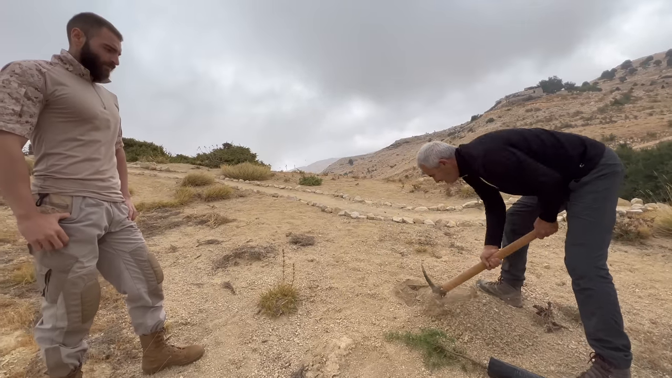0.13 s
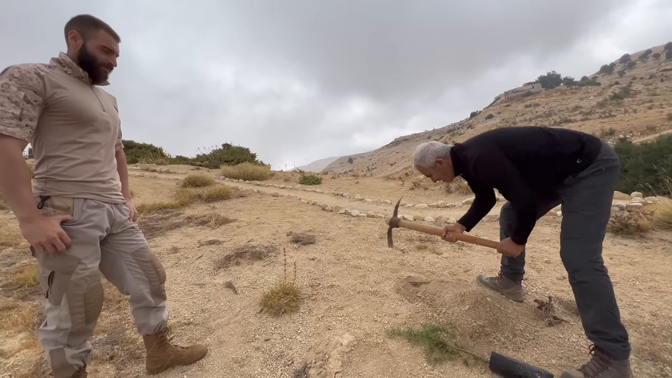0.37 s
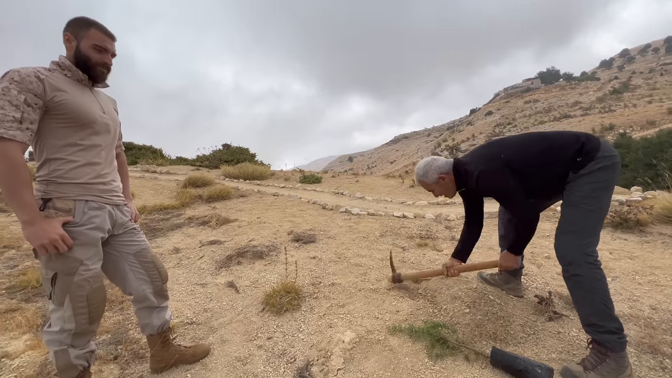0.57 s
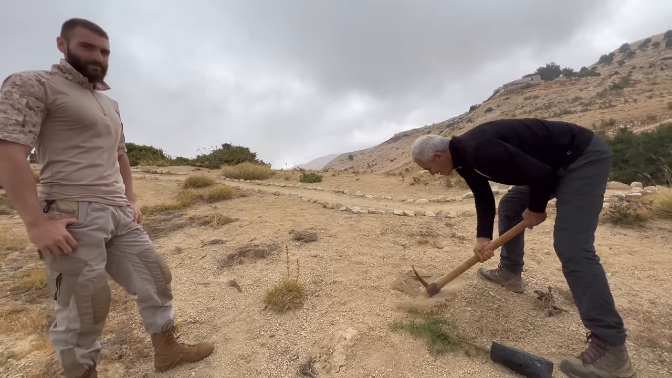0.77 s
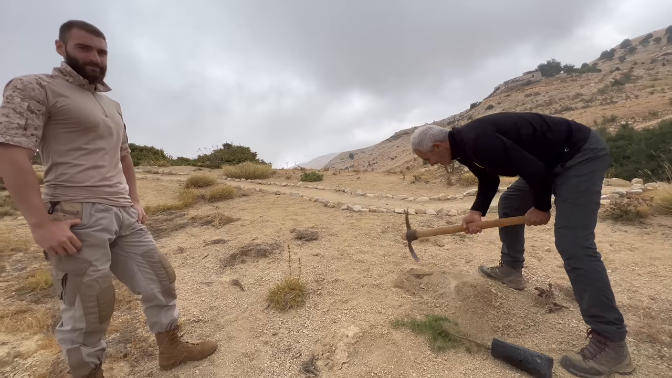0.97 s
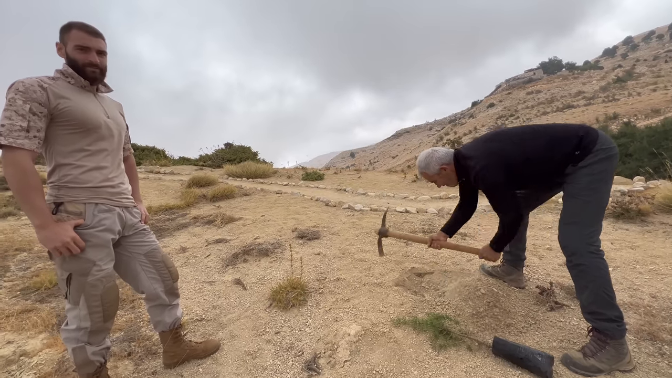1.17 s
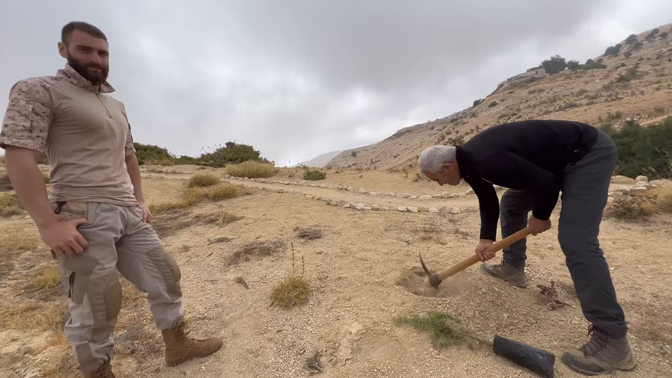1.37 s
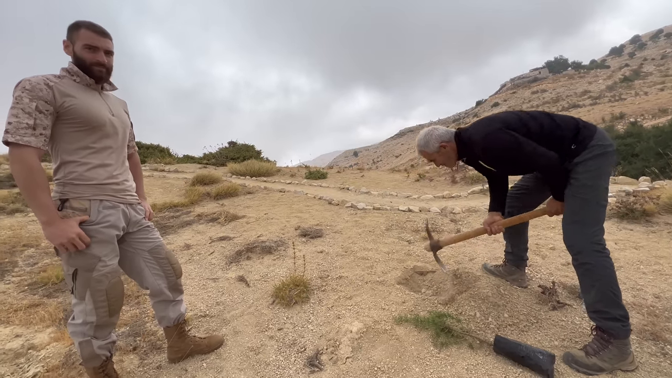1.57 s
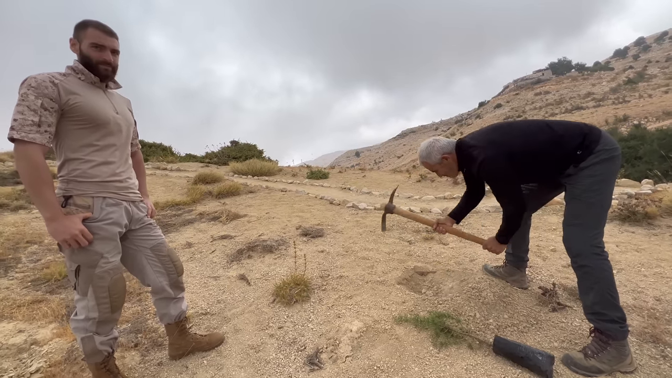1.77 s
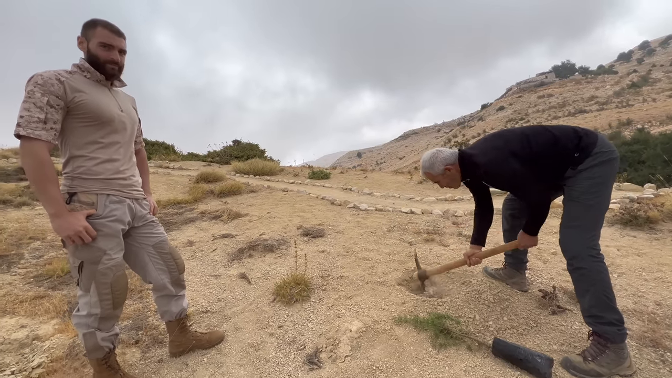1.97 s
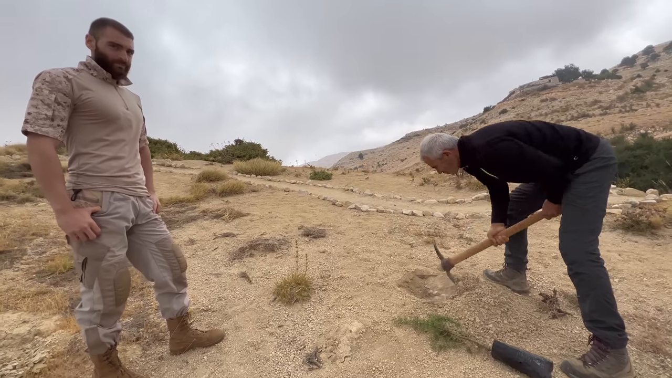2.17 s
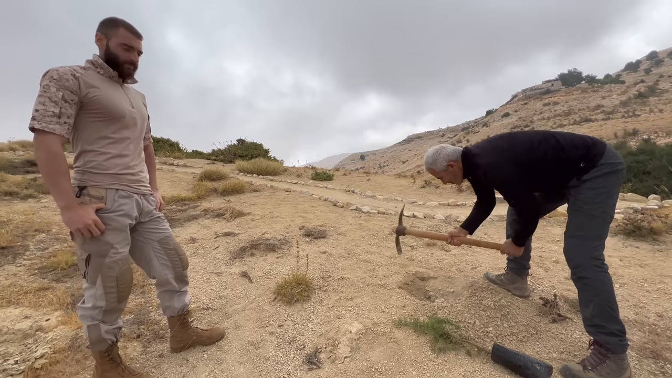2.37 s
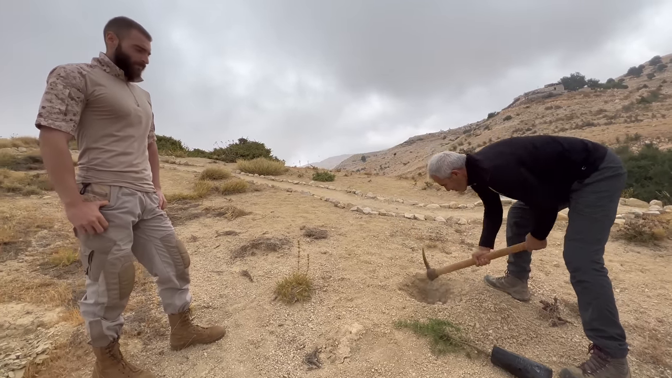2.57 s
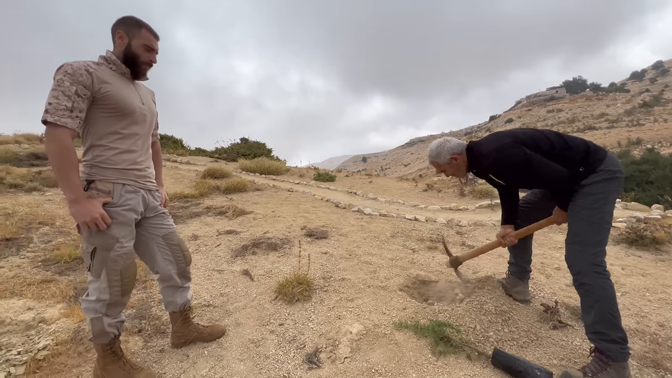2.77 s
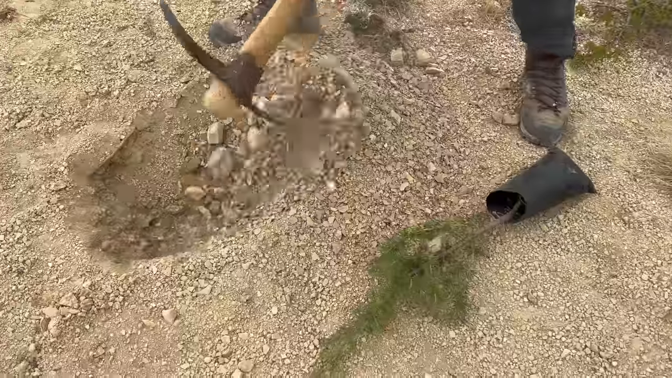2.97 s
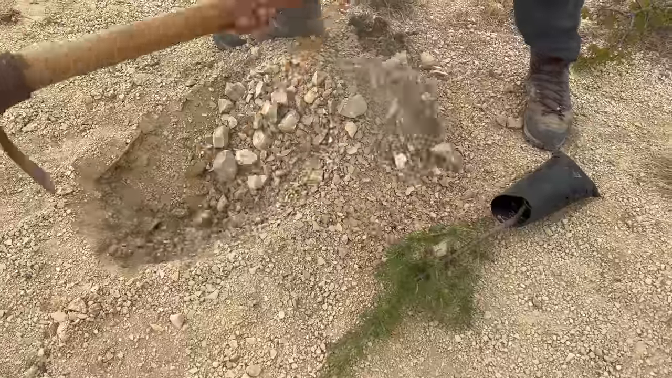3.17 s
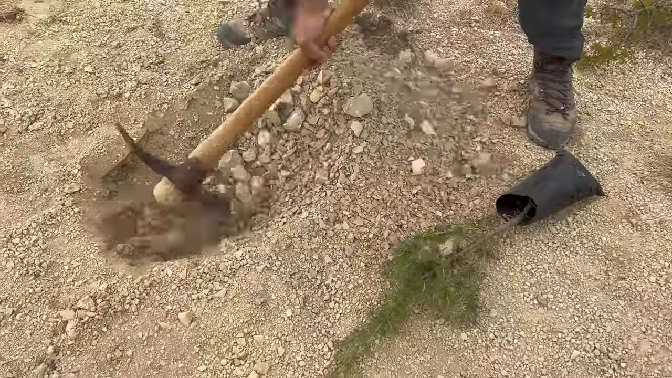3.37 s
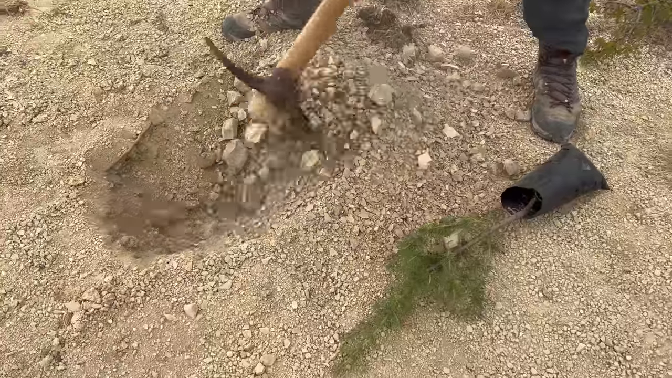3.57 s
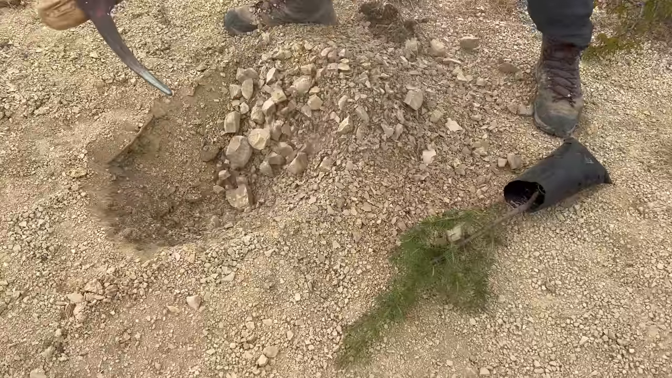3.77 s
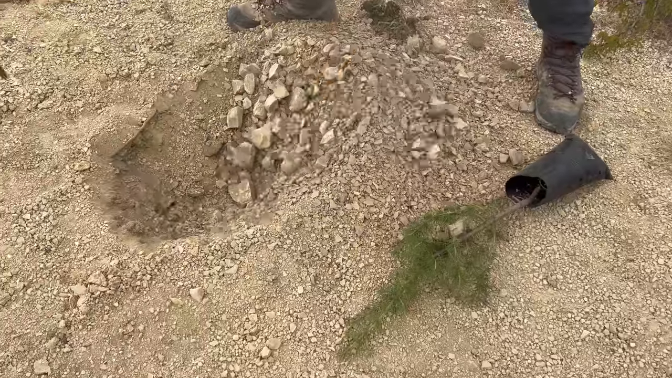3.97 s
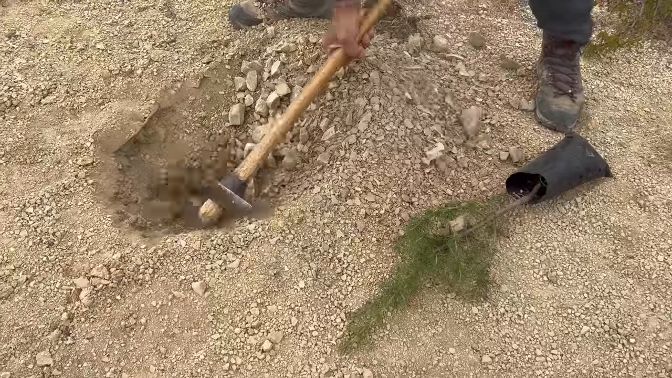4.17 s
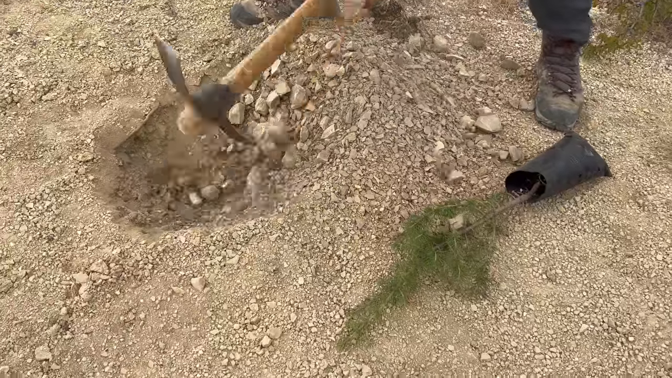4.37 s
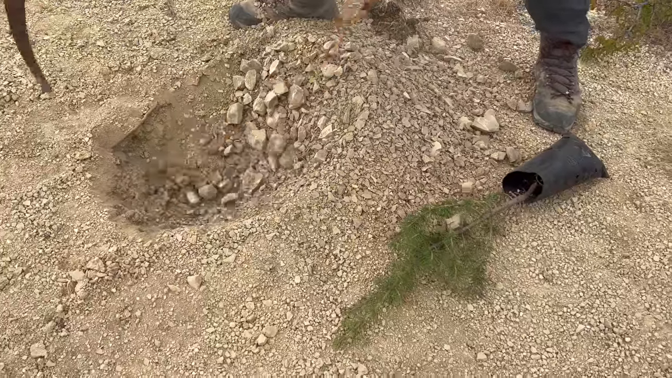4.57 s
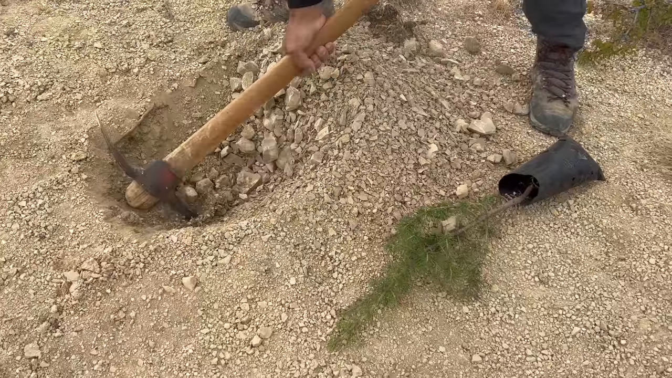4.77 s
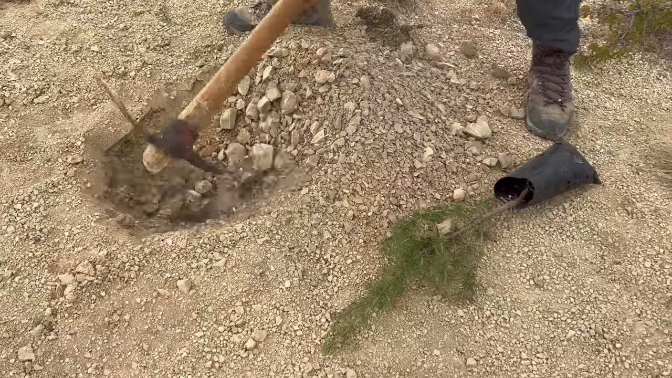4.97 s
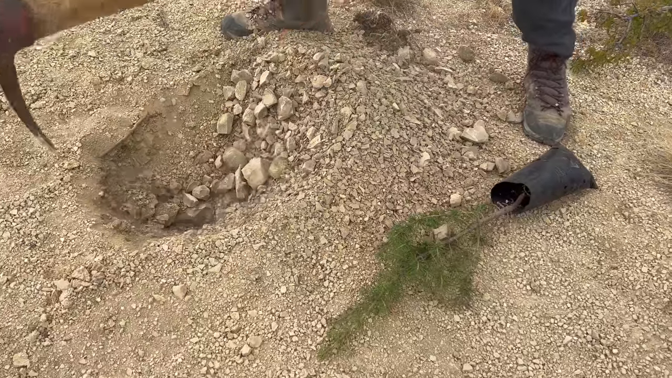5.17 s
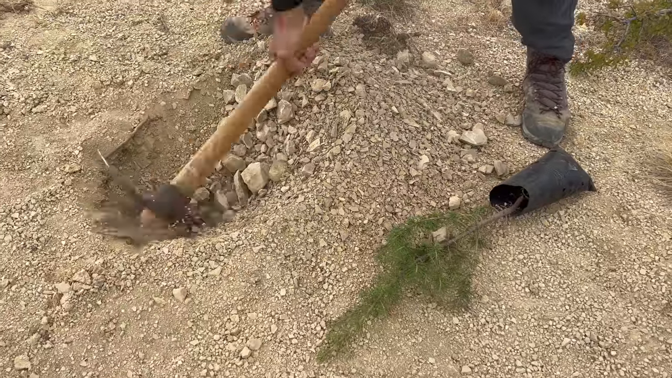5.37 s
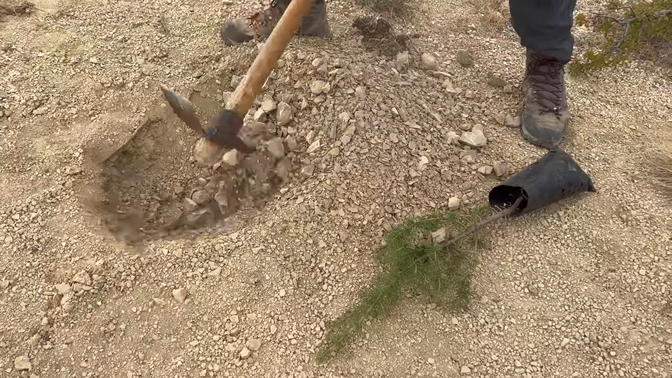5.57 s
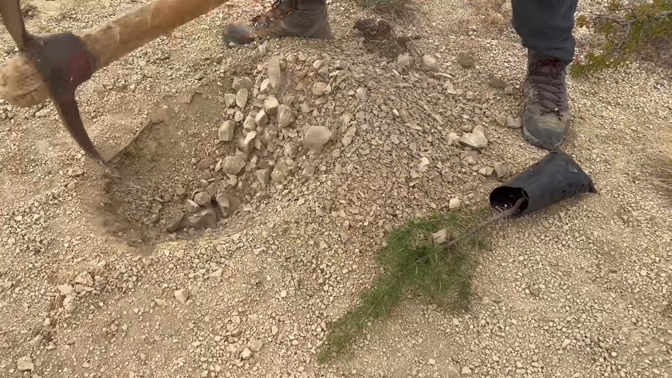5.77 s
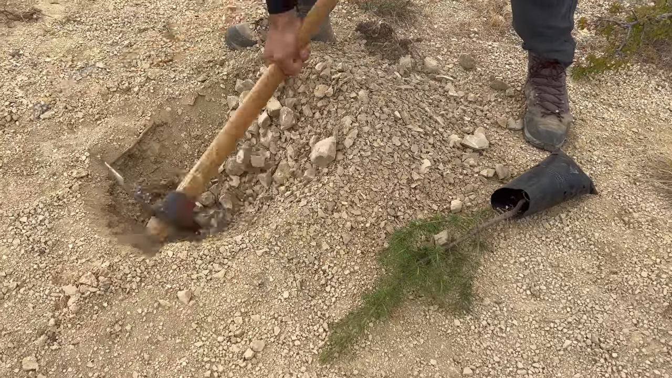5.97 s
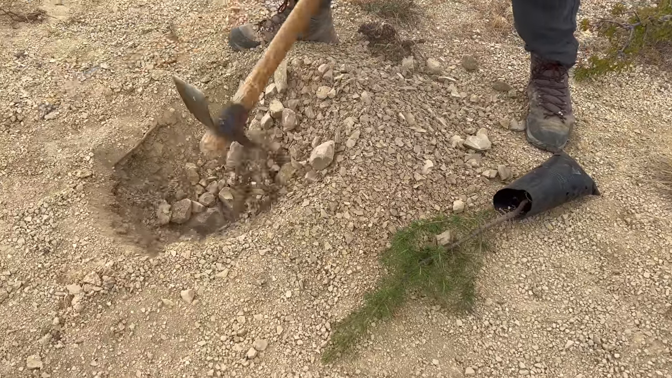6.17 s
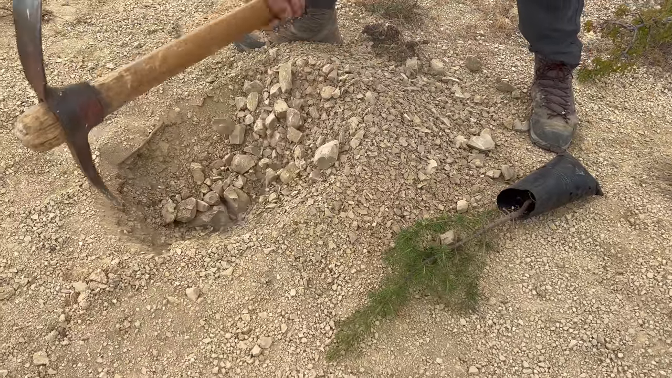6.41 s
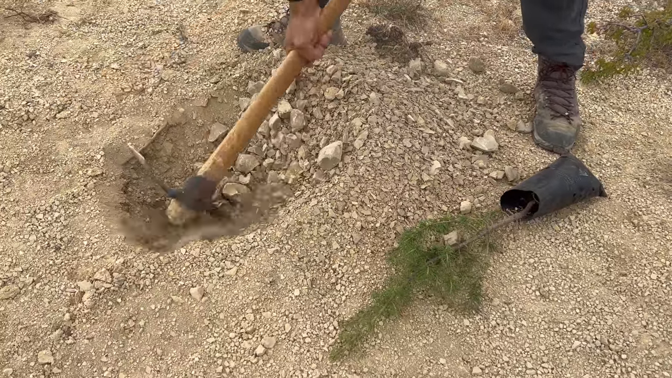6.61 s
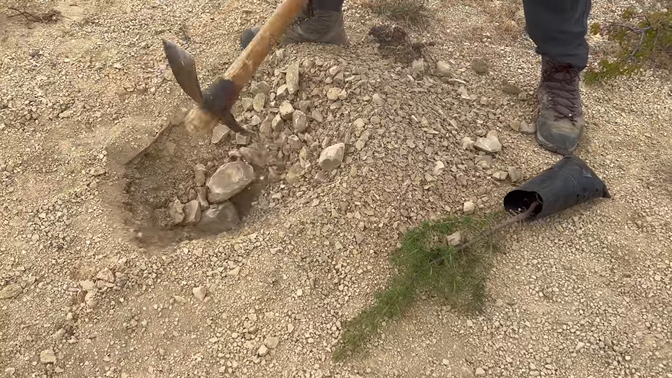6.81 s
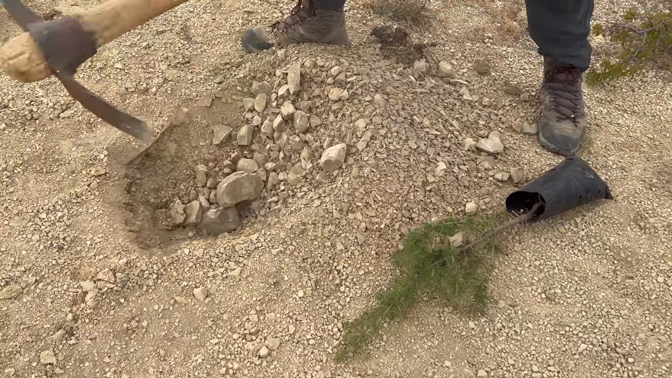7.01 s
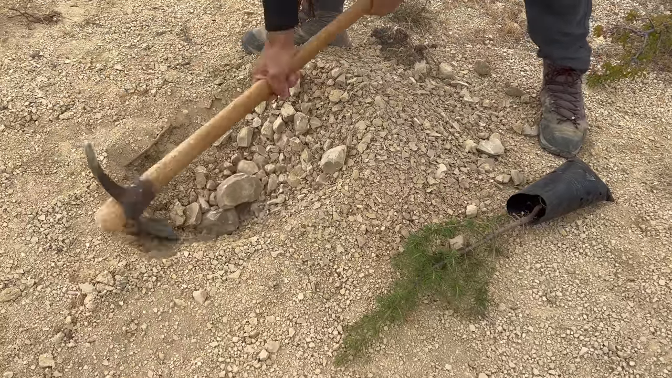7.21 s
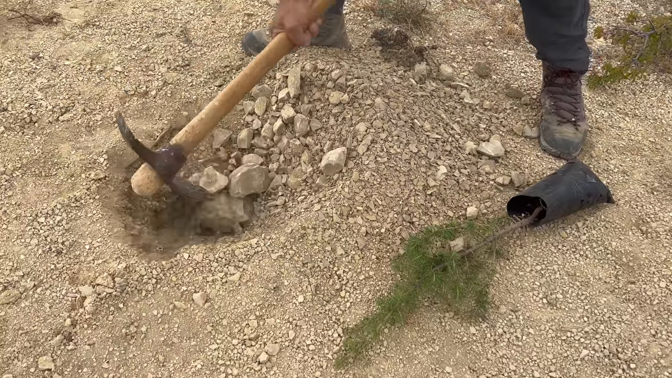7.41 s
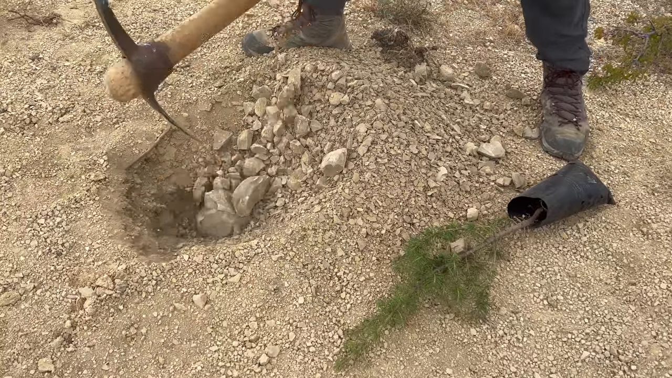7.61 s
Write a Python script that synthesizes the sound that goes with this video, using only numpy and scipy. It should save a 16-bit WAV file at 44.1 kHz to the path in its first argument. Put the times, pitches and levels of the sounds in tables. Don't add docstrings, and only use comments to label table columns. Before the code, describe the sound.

A mattock digs dry, stony soil outdoors. Four blows are heard from a distance, slightly dull, each a crunchy steel-on-stone clump followed by a short gravel drag. After a tiny dropout near 2.9 seconds the microphone is close: eight harder, brighter blows, the loudest overloaded, with sandy scraping, stone clacks, pebbles ticking down and brief rings from the freed steel head. Faint crumbs, dust and low rumble lie underneath, with no room echo.

```python
import sys
import numpy as np
from scipy import signal
from scipy.fft import rfft, irfft, next_fast_len
from scipy.io import wavfile
from scipy.ndimage import uniform_filter1d

SR = 44100
rng = np.random.default_rng(int(sys.argv[2]) if len(sys.argv) > 2 else 0)


def volts_from_db(level):
    exponent = np.asarray(level, float) / 20
    return 10 ** exponent


def wav_out(sig):
    wavfile.write(sys.argv[1], SR, np.round(np.clip(np.atleast_2d(sig).T, -1, 1) * 32767).astype(np.int16))


N = 337365
DROPOUT_START, DROPOUT_END = 2.859, 2.873

# arrival of the edge in seconds, dying time in ms, thud level in dB, grit level in dB.
STROKES = [(0.56, 37, -23, -21.5), (1.25, 31.6, -19, -17), (1.34, 26, -26.5, -40),
           (1.93, 22.3, -22.5, -17.5), (2.5, 47, -24.5, -16), (3.315, 24.6, -17, -13.5),
           (3.362, 12.3, -16.5, -28.5), (4.11, 23.5, -11, -19.5), (4.755, 49, -12, -24),
           (5.335, 24.4, -20.5, -25.5), (5.95, 32, -21, -26.5), (6.53, 39.4, -16.5, -30),
           (7.222, 15, -15.5, -20)]
# pitch in Hz, time to fall 60 dB in seconds, level when rubbed in dB.
STEEL_RINGS = [(964, .22, -2), (1593, .14, -2), (2083, .06, 0), (2902, .055, -6), (4040, .06, -8),
               (5330, .06, -11), (8646, .14, -19), (9200, .08, -19), (11310, .15, -25)]
# frequency in Hz, density in dB per Hz.
GRAVEL_COLOUR = [(200, -25), (500, -10.5), (900, -2.5), (1600, -5), (3000, -8), (5000, -11), (8000, -23.5),
                 (12000, -44.5)]
# frequency in Hz, density in dB per Hz.
CLOD_COLOUR = [(20, -26.5), (60, -3.5), (120, -1.5), (300, -4), (500, -7.5), (900, -46)]


def evened(x):
    return x / np.sqrt(np.mean(x ** 2) + 1e-20)


def peaked(x):
    return x / (abs(x).max() + 1e-20)


def add(mix, s, sound):
    part = mix[round(s * SR):][:len(sound)]
    part += sound[:len(part)]


def ringing(x, modes):
    size = next_fast_len(len(x))
    f = np.fft.rfftfreq(size, 1 / SR)
    gain = 0
    for k, (hz, width, db) in enumerate(modes):
        loss = 1j * f * abs(width)
        gain = gain + (-1) ** k * volts_from_db(db) * loss / (hz ** 2 - f ** 2 + loss + 1e-9)
    return irfft(rfft(x, size) * gain, size)[:len(x)]


def coloured(x, points):
    hz, db = np.transpose(points)
    size = next_fast_len(len(x))
    f = np.fft.rfftfreq(size, 1 / SR)
    gain = volts_from_db(np.interp(np.log(f + 1), np.log(hz), db))
    return evened(irfft(rfft(x, size) * gain, size)[:len(x)])


def wander(size, span):
    smooth = uniform_filter1d(rng.standard_normal(size), span)
    return evened(uniform_filter1d(smooth, span))


def grains(size, per_s, spread_db):
    hit, sign, big = rng.random((size, 3)).T
    strength = volts_from_db(spread_db * np.minimum(-np.log(1 - big), 5))
    return (hit < per_s / SR) * np.sign(sign - .5) * strength


def crumbs(size, per_s, spread_db, low_hz, high_hz, cycles, count=9):
    clicks = grains(size, per_s, spread_db)
    which = rng.integers(0, count, size)
    out = np.zeros(size)
    for k, hz in enumerate(np.geomspace(low_hz, high_hz, count)):
        turns = np.arange(int(np.clip(cycles, 1, 12) * SR / hz)) * hz / SR
        shape = np.sin(2 * np.pi * turns) * np.hanning(len(turns)) ** .5 * np.exp(-2.5 * turns / cycles)
        click = evened(shape) / len(turns)
        out += signal.oaconvolve(clicks * (which == k), click)[:size] * np.sqrt(SR / hz)
    return evened(out)


def settling():
    # time in seconds, level in dB.
    far_loose = [
        (0.0, -48),
        (0.28, -67),
        (1.59, -64.5),
        (1.69, -69.5),
        (2.63, -69.5),
        (2.85, -63),
    ]
    near_loose = [(2.88, -60), (3.2, -60), (3.5, -55.5), (3.62, -60.5), (3.76, -54.5), (4.1, -64.5),
                  (4.3, -60.5), (4.6, -69), (5.55, -64), (5.8, -64.5), (6.9, -64), (7.2, -69)]
    # frequency in Hz, density in dB per Hz.
    dust_colour = [(300, -19), (1500, -2.5), (4000, -7), (8000, 0), (13000, -0.5), (15600, -0.5),
                   (16200, -27)]
    t = np.arange(N) / SR
    moving_db = np.interp(t, *np.transpose(far_loose + near_loose)) + 66

    def level(far_db, near_db, share):
        return np.where(t < DROPOUT_END, far_db, near_db) + share * moving_db

    patter = rng.standard_normal(N) + .45 * crumbs(
        N, per_s=500, spread_db=3.5, low_hz=700, high_hz=5000, cycles=3.0, count=5)
    dust = rng.standard_normal(N) + 0.31 * crumbs(
        N, per_s=530, spread_db=6.5, low_hz=4000, high_hz=14000, cycles=2.1, count=5)
    rumble = coloured(rng.standard_normal(N), CLOD_COLOUR)
    rumble_db = level(-70, -65.5, .4) + 2.2 * wander(N, span=1500)
    out = volts_from_db(level(-67.5, -68, 1)) * coloured(patter, GRAVEL_COLOUR)
    out += volts_from_db(level(-70.5, -72.5, 0.93)) * coloured(dust, dust_colour)
    return out + volts_from_db(rumble_db) * rumble


def nudge():
    out = np.zeros(N)
    length_s = .08
    t = np.arange(0, length_s, 1 / SR)
    add(out, 2.765, volts_from_db(-49) * np.sin(2 * np.pi * 50 * t) * np.sin(np.pi * t / length_s) ** 2)
    return out


def clatter():
    # start in seconds, peak level in dB, pitch in Hz.
    clacks = [(0.0156, -27, 3360), (0.0801, -22, 3440), (0.1903, -40, 720), (0.226, -46, 2840),
              (0.6206, -20.5, 1470), (0.9463, -49, 1160), (1.1688, -54, 1080), (1.2899, -27, 1720),
              (1.3517, -23.5, 900), (1.447, -28.5, 3180), (1.5664, -47, 1510), (1.5859, -53, 1890),
              (1.5998, -48, 1720), (1.6884, -50, 2020), (1.727, -52, 1160), (2.2445, -55.5, 1670),
              (2.5257, -27, 1510), (2.5375, -12.5, 1910), (2.7085, -41, 1420), (2.9141, -37, 1210),
              (2.9629, -35, 3030), (3.0978, -43, 3230), (3.454, -28, 2020), (3.4703, -20.5, 1400),
              (3.4787, -29, 2240), (3.5395, -30.5, 2330), (3.5602, -45, 1120), (3.5893, -45, 2150),
              (3.6464, -40, 1080), (3.8347, -42.5, 730), (4.177, -25, 820), (4.2916, -35, 2050),
              (4.3242, -42, 776), (4.347, -30, 800), (4.3606, -47, 2070), (4.5575, -47, 5000),
              (4.8463, -39, 1852), (4.8699, -39, 1640), (4.8844, -45, 1770), (4.8992, -26, 990),
              (5.0066, -51, 1380), (5.2966, -53, 2546), (5.4808, -32, 950), (5.6387, -29.5, 2150),
              (5.6692, -46.5, 1544), (5.7885, -47.5, 1550), (5.8614, -48.5, 1160), (5.8716, -46, 4580),
              (6.1204, -17.5, 1780), (6.1579, -25.5, 1830), (6.1816, -25, 1030), (6.2761, -41, 1810),
              (6.6618, -30, 2226), (6.7231, -41, 1946), (6.9562, -55, 1204), (7.4035, -36.5, 1167),
              (7.445, -37, 1730), (7.6433, -57, 3620)]
    # start in seconds, peak level in dB, pitch in Hz.
    splinters = [(0.0412, -42, 5120), (0.0877, -31, 5300), (0.3104, -45, 5080), (0.6918, -46, 5340),
                 (0.7202, -31, 5810), (0.784, -39, 5600), (1.4479, -45, 5600), (1.4629, -45.5, 5380),
                 (2.3992, -48, 5900), (2.6211, -37, 5250), (2.9537, -31, 10900), (3.0309, -42, 5040),
                 (3.0769, -43, 13090), (3.1481, -41, 7110), (3.3852, -29, 5860), (3.4249, -35.5, 5680),
                 (3.4391, -19.5, 5680), (3.7534, -34, 7580), (4.1453, -18.5, 7360), (4.1822, -35, 6120),
                 (4.2225, -43, 6930), (4.3376, -35, 6460), (4.3681, -47.5, 9430), (4.3727, -45, 5080),
                 (4.5472, -50, 12000), (4.5575, -40, 7280), (5.0538, -45, 13300), (5.1656, -53.5, 13150),
                 (5.244, -47, 9560), (5.5391, -34, 6370), (5.7339, -56.5, 8570), (5.955, -43.5, 8380),
                 (5.9622, -10.5, 5170), (5.9949, -34, 6330), (6.107, -22.5, 5380), (6.1212, -31, 5380),
                 (6.1406, -38, 9220), (6.2494, -39, 11930), (6.3415, -53, 11900), (6.3591, -49, 9170),
                 (6.3888, -47.5, 12620), (6.5962, -44, 11900), (6.6151, -44, 6160), (6.622, -40, 12450),
                 (6.7486, -36, 7240), (6.7802, -48, 6460), (6.922, -50.5, 8870), (7.0854, -47, 5511),
                 (7.5459, -35, 11280), (7.6434, -59, 5100)]
    out, t = np.zeros(N), np.arange(768) / SR
    for rows, lasting_s, width in ((clacks, .009, .25), (splinters, .004, .6)):
        for s, db, hz in rows:
            after_grains = rng.standard_normal(len(t)) * volts_from_db(-60 * t / lasting_s)
            snap = (t == 0) + 0.12 * after_grains
            stone = ringing(snap, [(hz, width * hz, 0), (1.8 * hz, 1.1 * hz, -9)])
            add(out, s, volts_from_db(db) * peaked(ringing(stone, [(1.05 * hz, 2.2 * hz, 0)])))
    return out


def pebbles():
    # start in seconds, peak level in dB, pitch in Hz.
    pebble_rows = [(1.653, -43, 880), (2.193, -50, 2155), (2.308, -49.5, 1000), (2.396, -41, 795),
                   (3.624, -36, 1020), (3.718, -39, 680), (3.752, -40.5, 396), (3.792, -41, 346),
                   (3.834, -45, 354), (4.582, -47.5, 1327), (4.607, -47.5, 1500), (5.03, -32.5, 1330),
                   (5.061, -42.5, 676), (5.314, -49, 1220), (5.649, -33, 1496), (5.673, -33.5, 1470),
                   (6.269, -40, 1010), (6.29, -46, 961), (6.369, -47.5, 541), (6.805, -33, 910),
                   (6.944, -46.5, 528), (7.544, -39.5, 560), (7.578, -40, 1680), (7.588, -40, 656),
                   (7.633, -36.5, 1330)]
    # start in seconds, peak level in dB, pitch in Hz.
    chip_rows = [(2.2762, -34, 3470), (2.9532, -43, 3050), (3.0905, -37.5, 1900), (3.2255, -31.5, 2500),
                 (3.568, -45, 3760), (3.6581, -37.5, 2560), (3.926, -42, 4430), (4.4523, -48, 4520),
                 (5.1282, -34.5, 3000), (5.192, -40.5, 8560), (5.2191, -46.5, 3580), (5.2444, -52.5, 2600),
                 (5.618, -49, 3600), (5.6388, -41.5, 3000), (5.8718, -42, 4550), (6.3084, -39, 11200),
                 (6.351, -41.5, 6430), (6.98, -50.5, 3780), (7.0515, -37.5, 4320), (7.0853, -43.5, 2630),
                 (7.547, -48, 3200), (7.5966, -44, 3600)]
    out, t = np.zeros(N), np.arange(1024) / SR
    for s, db, hz in pebble_rows + chip_rows:
        tap = rng.standard_normal(len(t)) * volts_from_db(-60 * t / (.002 + 3 / hz)) * np.minimum(t * hz, 1)
        stone = ringing(tap, [(hz, .7 * hz, 0)])
        add(out, s, volts_from_db(db) * peaked(ringing(stone, [(1.2 * hz, 1.5 * hz, 0)])))
    return out


def pull(top_s, db, swell_s, fade_s):
    blow_s = max([0] + [row[0] + .015 for row in STROKES if row[0] < top_s])
    swell_s, fade_s = max(swell_s, .004), max(fade_s, .01)
    t = np.arange(max(top_s - swell_s, blow_s), top_s + fade_s + .02, 1 / SR)
    away = np.maximum((top_s - t) / swell_s, (t - top_s) / fade_s)
    return t, db - 25 * away ** 1.4


def drag(top_s, top_db, swell_s, fade_s, share_db):
    # frequency in Hz, density in dB per Hz.
    hiss_colour = [(1200, -24), (3000, -4.5), (6000, -6), (11000, -2), (15600, -2.5), (16200, -34.5)]
    t, scrape_db = pull(top_s, top_db, swell_s, fade_s)
    sand_db = top_db + share_db + 1.3 * (scrape_db - top_db)
    slips = volts_from_db(3.1 * wander(len(t), span=220))
    crunch = grains(len(t), per_s=2400, spread_db=4.0) * slips

    rubbed = np.zeros(len(t))
    for hz, _, db in STEEL_RINGS:
        touch = crunch * volts_from_db(5.5 * wander(len(t), span=1100))
        detuned_hz = hz * (1 + .012 * rng.standard_normal())
        rubbed += volts_from_db(db) * evened(ringing(touch, [(detuned_hz, 45 + 0.012 * hz, 0)]))
    rub_db = 0.8 - .5 * max(share_db + 14, 0)

    gravel = slips * crumbs(len(t), per_s=3000, spread_db=5.0, low_hz=500, high_hz=9000, cycles=5.0)
    clods = coloured(crunch * volts_from_db(1.3 * wander(len(t), span=600)), CLOD_COLOUR)
    scrape = evened(coloured(gravel, GRAVEL_COLOUR) + volts_from_db(rub_db) * evened(rubbed)) + volts_from_db(-14.0) * clods
    sand = slips * crumbs(len(t), per_s=12000, spread_db=3.5, low_hz=2500, high_hz=14000, cycles=4.0)
    fade = np.minimum(np.minimum((t - t[0]) / .004, (t[-1] - t) / .02), 1)
    return t[0], (volts_from_db(scrape_db) * scrape + volts_from_db(sand_db) * coloured(sand, hiss_colour)) * fade


def drags():
    # time of the top in seconds, level in dB, swell in seconds, fade in seconds, sand share in dB.
    far_pulls = [(0.021, -36, 0.15, 0.079, -33), (0.093, -35.5, .04, 0.014, -29),
                 (0.126, -54, 0.051, 0.14, -27), (0.724, -42.5, .14, 0.04, -14),
                 (0.794, -47.5, 0.16, 0.073, -15), (1.403, -37, 0.052, 0.041, -8),
                 (1.461, -44.5, 0.11, 0.032, -21), (2.045, -37, .3, 0.078, -28),
                 (2.101, -55.5, .1, 0.18, -28), (2.631, -43.5, 0.072, 0.086, -26),
                 (2.694, -54.5, .2, 0.044, -28), (2.831, -53.5, 0.085, 0.035, -27)]
    near_pulls = [(2.878, -44.5, 0.0055, 0.19, -9), (3.24, -53, .22, 0.14, 2),
                  (3.265, -44.5, .06, .04, -20), (3.432, -46, 0.057, 0.025, -11.5),
                  (3.468, -35.5, 0.18, .1, -35), (3.535, -44, 0.14, 0.052, -30),
                  (4.166, -35, 0.035, 0.19, -30.5), (4.359, -50, 0.25, 0.11, -29),
                  (4.81, -39.5, 0.028, 0.25, -28), (4.931, -40.5, .12, 0.07, -31),
                  (5.462, -43, 0.11, 0.29, -28.5), (5.526, -46, .15, 0.071, -10),
                  (5.622, -72, .2, 0.13, -23), (6.004, -37.5, 0.027, 0.042, -30),
                  (6.112, -35, .12, 0.072, -29), (6.146, -42, 0.13, 0.018, -7),
                  (6.581, -49.5, .02, 0.16, -15), (6.659, -36, .08, 0.038, -35),
                  (6.739, -51, .12, 0.046, -16), (7.076, -54.5, 0.12, 0.073, -18.5),
                  (7.273, -51, 0.027, 0.095, -19), (7.381, -57.5, 0.085, 0.11, -10),
                  (7.437, -41, 0.047, 0.037, -21), (7.593, -58, 0.14, 0.042, -6.5),
                  (7.64, -60, 0.055, 0.017, -23)]
    out = np.zeros(N)
    for row in far_pulls + near_pulls:
        add(out, *drag(*row))
    return out


def steel():
    # start in seconds, pitch in Hz, level in dB.
    knocks = [(0.64, 960, -46), (0.735, 4040, -49), (1.266, 8700, -38), (1.272, 3100, -31),
              (1.274, 5400, -34), (2.9, 965, -51), (2.961, 962, -46.5), (2.96, 11400, -59),
              (3.636, 968, -48.5), (4.275, 4040, -45), (4.29, 2080, -41), (4.348, 2080, -44),
              (4.376, 2900, -45), (4.391, 966, -29), (4.797, 5350, -37), (4.81, 9100, -51),
              (5.395, 5330, -47), (5.4, 8700, -51), (5.568, 957, -44), (5.601, 962, -45),
              (5.604, 5330, -54), (5.988, 8700, -51), (6.1, 5330, -39), (6.122, 970, -35), (6.18, 963, -29),
              (6.18, 1590, -44), (6.181, 2890, -42), (6.743, 966, -50), (7.05, 2100, -53),
              (7.075, 2100, -53), (7.435, 977, -46), (7.434, 11300, -60), (7.485, 8700, -63),
              (7.486, 7900, -63)]
    out, t = np.zeros(N), np.arange(SR // 2) / SR
    mode_hz, mode_t60, _ = np.transpose(STEEL_RINGS)
    for s, hz, db in knocks:
        t60 = .8 * np.interp(hz, mode_hz, mode_t60)
        ring = volts_from_db(-60 * t / t60) * np.sin(2 * np.pi * hz * t)
        twin = volts_from_db(-16 - 60 * t / (2.3 * t60)) * np.sin(2 * np.pi * (hz + 2.5) * t)
        add(out, s, volts_from_db(db) * (ring + twin) * np.minimum(t / 0.00082, 1))
    return out


def contact(db, stone_hz, dying_ms, thud_db, grit_db, snap):
    # pitch in Hz, width in Hz, level in dB.
    damped_head = [(360, 46, -1), (867, 140, 11), (1516, 120, 10), (2180, 753, 9.5), (2970, 990, 6),
                   (4340, 750, 2.5), (5160, 1500, -3.5), (6950, 1100, -19)]
    t = np.arange(4096) / SR
    dying = np.clip(dying_ms, 3, 90) / 1000
    crush = grains(len(t), per_s=5000, spread_db=4.0)
    crush = crush * volts_from_db(-60 * (t / dying) ** 1.225) * np.minimum(t / 0.0022, 1)

    crack = snap * abs(crush).max() * np.exp(-((t - .001) / .00003) ** 2)
    blow = crush + crack
    stone = ringing(blow, [(stone_hz, 0.15 * stone_hz, 0)])
    body = peaked(ringing(blow, damped_head)) + 1.6 * peaked(stone)

    fines = rng.standard_normal(len(t)) * volts_from_db(-45 * (t / dying) ** 1.1) * np.minimum(t / 0.0033, 1)
    grit = ringing(peaked(crush) + 0.55 * fines, [
        (5000, 290, 3), (8870, 290, 6.5), (9550, 11000, -4.5), (11960, 350, 0.5), (14000, 5000, -33.5)])

    push = rng.standard_normal(len(t)) * volts_from_db(-60 * t / (dying + 0.005)) * np.minimum(t / 0.0011, 1)
    ground = ringing(push, [(117, 25, 1.0), (248, 110, -2.0), (387, 140, -0.5), (660, 82, -5.5)])
    thud = ringing(ground, [(307.0, 460, 0)])
    return volts_from_db(db) * (peaked(body) + volts_from_db(grit_db) * peaked(grit) + volts_from_db(thud_db) * peaked(thud))


def strikes():
    # start in seconds, peak level in dB, stone pitch in Hz.
    far_contacts = [(0.57, -25.5, 1480), (0.579, -9, 2000), (0.596, -12.5, 1840), (0.605, -18, 3520),
                    (0.619, -26, 1520), (1.256, -29.5, 1170), (1.266, -8.5, 4380), (1.268, -3, 1380),
                    (1.289, -26, 1270), (1.35, -20, 2300), (1.938, -19.5, 1510), (1.941, -0.5, 1475),
                    (1.943, -1.5, 2160), (1.952, -11, 1940), (2.512, -36, 1460), (2.516, -23, 1420),
                    (2.531, -13, 2020), (2.567, -22.5, 2970), (2.573, -24.5, 1334)]
    near_contacts = [(3.327, 1.5, 1570), (3.328, -1, 875), (3.339, -12.5, 800), (3.354, -14.5, 1390),
                     (3.369, -2.5, 1410), (4.121, -19.5, 931), (4.128, -1.5, 894), (4.134, -5, 2220),
                     (4.144, -5, 950), (4.148, -7, 676), (4.767, -25.5, 2885), (4.777, 1.5, 875),
                     (4.784, -16, 1696), (5.344, -36, 866), (5.36, -12, 3700), (5.367, -4.5, 900),
                     (5.375, 5, 1565), (5.38, -2.5, 1165), (5.39, -9.5, 1880), (5.961, 0.5, 912),
                     (5.967, -4, 1007), (5.974, -1, 1900), (6.54, -15.5, 1480), (6.549, -6, 2084),
                     (6.557, -4.5, 1520), (6.565, -12, 1550), (7.233, -23.5, 3034), (7.238, -4, 1496),
                     (7.246, -10.5, 2760), (7.251, -1, 813)]
    # start in seconds,
    # peak level in dB, stone pitch in Hz.
    far_stones = [(0.014, -26, 3500), (0.028, -23, 1020), (0.059, -27.5, 3500), (0.085, -33, 2080),
                  (0.188, -39, 607), (0.225, -41, 2310), (0.69, -41, 1420), (0.723, -20.5, 2150),
                  (1.4, -21, 1100), (1.447, -35.5, 1450), (2.002, -16.5, 1430), (2.032, -28, 1230),
                  (2.044, -25, 2920), (2.619, -43, 1410)]
    near_stones = [(3.383, -19.5, 1520), (3.424, -23.5, 1590), (3.434, -19, 2200), (4.213, -20.5, 1820),
                   (4.241, -29, 996), (4.251, -23.5, 765), (4.339, -41, 858), (4.392, -35, 930),
                   (4.857, -24, 1640), (4.917, -23.5, 1830), (4.959, -27.5, 1100), (5.439, -31, 1120),
                   (5.49, -24.5, 800), (5.516, -14.5, 830), (5.538, -29, 1200), (5.6, -31, 1018),
                   (5.994, -18, 840), (6.083, -25, 794), (6.107, -21.5, 1570), (6.119, -21, 950),
                   (6.18, -29.5, 975), (6.613, -22.5, 1280), (6.653, -28, 2230), (7.431, -29.5, 2250),
                   (7.483, -35.5, 2050)]
    out, last = np.zeros(N), None
    for s, db, stone_hz in far_contacts + near_contacts:
        start, dying_ms, thud_db, grit_db = [row for row in STROKES if row[0] < s][-1]
        first = start != last
        slide = 1.5 if first else 1
        sound = contact(db, stone_hz, dying_ms * slide, thud_db - .45 * db, grit_db - 0.15 * db,
                        snap=0 if first else .7)
        add(out, s, sound)
        last = start
    for stones, grit_db in ((far_stones, -28), (near_stones, -24)):
        for s, db, stone_hz in stones:
            add(out, s, contact(db, stone_hz, dying_ms=18.5, thud_db=-13.0, grit_db=grit_db, snap=.8))
    return out


def scene():
    dig = pebbles() + drags() + steel() + strikes()
    bounce = 0.11 * np.roll(dig, 70)
    dry = settling() + nudge() + clatter() + dig + bounce
    return dry[None]


def low_pass(x):
    return signal.sosfilt(signal.butter(12, 16810, fs=SR, output="sos"), x)


def record(dry):
    t = np.arange(N) / SR
    top = signal.sosfilt(signal.butter(2, 7000, "high", fs=SR, output="sos"), dry)
    low = signal.sosfilt(signal.butter(2, 7000, fs=SR, output="sos"), dry)
    heard = low - top * np.where(t < DROPOUT_START, volts_from_db(-13.5), 1)
    ceiling = .62
    limited = heard / (1 + abs(heard / ceiling) ** 6) ** (1 / 6)
    gate_s = [DROPOUT_START - .003, DROPOUT_START, DROPOUT_END, DROPOUT_END + 0.003]
    gate = np.interp(t, gate_s, [0.87, 0.022, .03, 0.78])
    band_edge = signal.firwin(255, 16000, window=("kaiser", 7), fs=SR)
    mix = signal.oaconvolve(limited * gate, band_edge[None], "same")
    return low_pass(mix)


dry = scene()
out = record(dry)
wav_out(out)
```